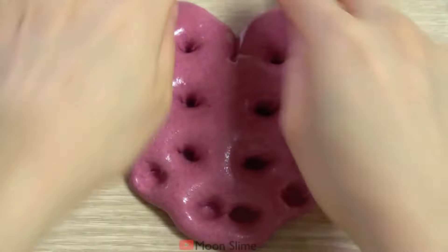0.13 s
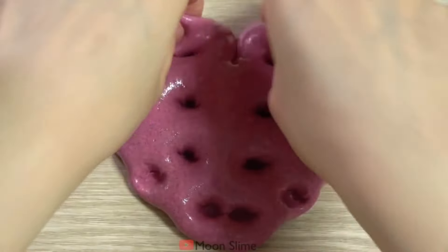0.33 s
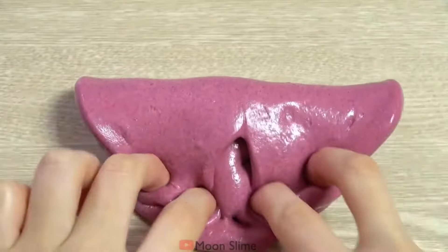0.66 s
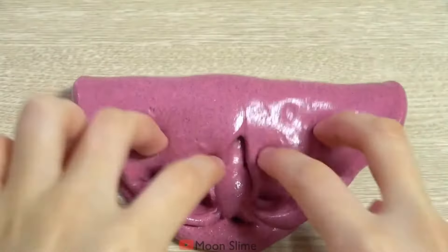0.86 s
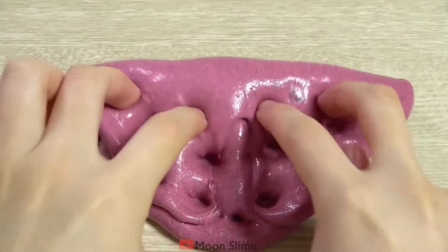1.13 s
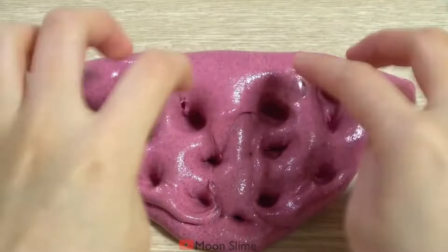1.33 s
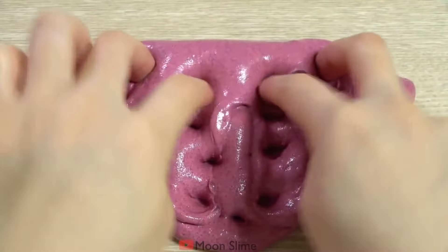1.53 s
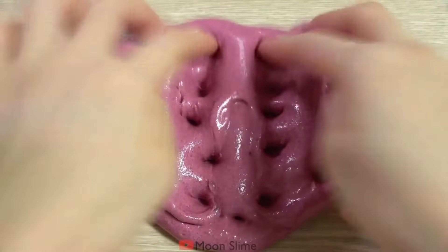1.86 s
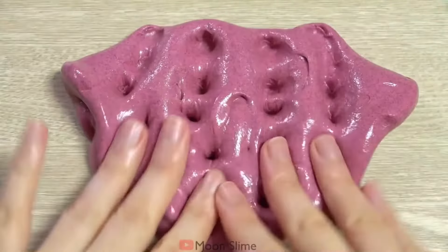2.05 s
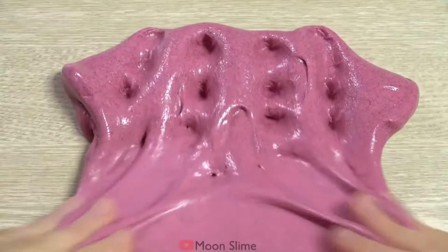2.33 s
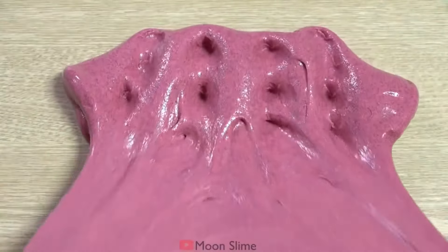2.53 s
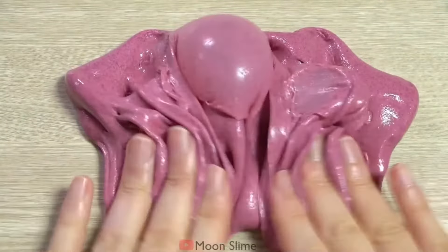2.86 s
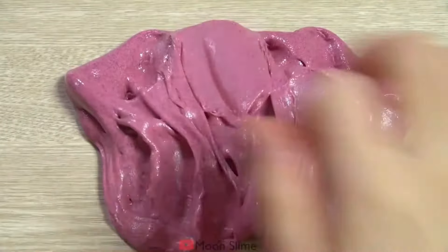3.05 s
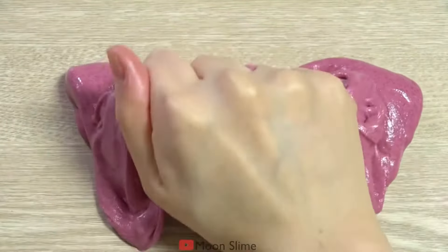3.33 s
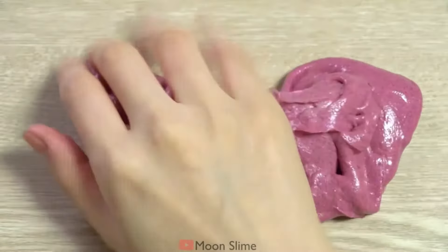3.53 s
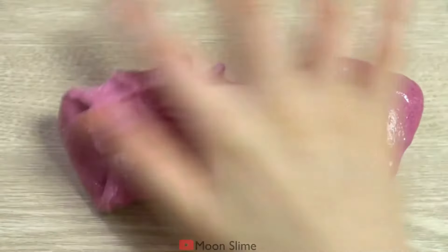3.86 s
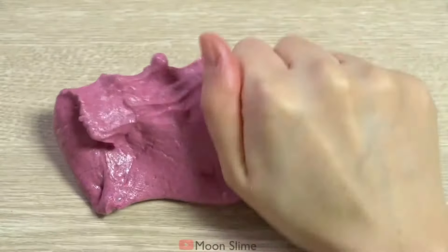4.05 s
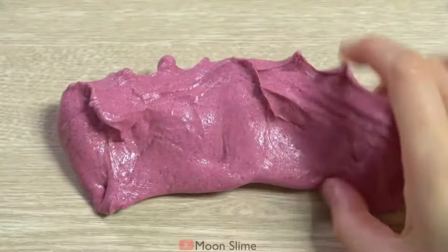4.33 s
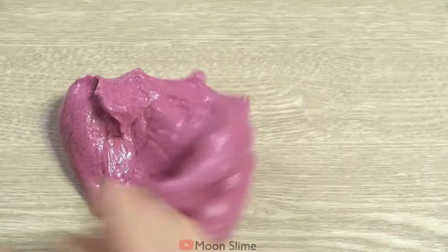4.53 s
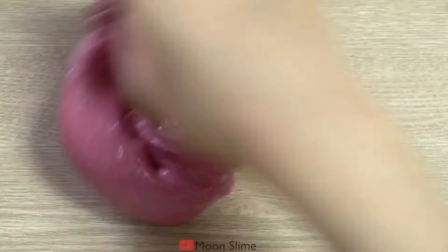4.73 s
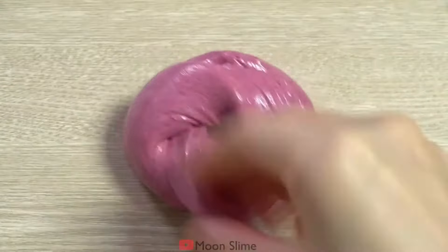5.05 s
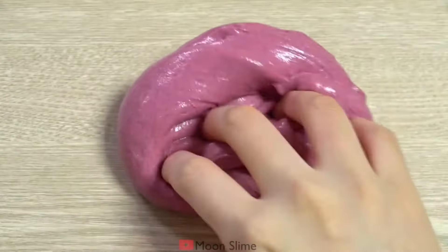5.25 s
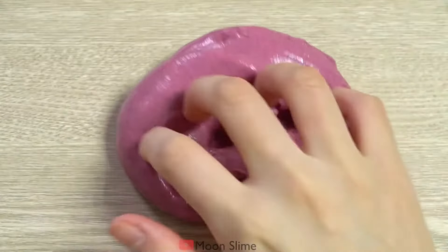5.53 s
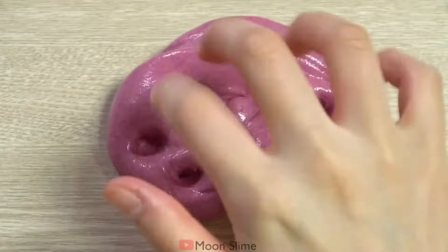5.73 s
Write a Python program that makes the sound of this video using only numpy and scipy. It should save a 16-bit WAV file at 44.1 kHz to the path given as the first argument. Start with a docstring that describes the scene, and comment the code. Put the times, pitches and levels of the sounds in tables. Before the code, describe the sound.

Soft slime is handled on a wooden table, close to the microphone in a small, quiet, nearly dry room. A faint squelch and low thump open the scene, followed by a brief peeling fizz near 0.5 s. From 0.85 to 1.75 s, separate pokes come about every quarter second, each a short wet squish with a round hollow pop and a soft bass thud. Gentler, muddier squelches follow from 2 to 2.4 s, then a pause. From 2.9 s folding grows busy; the strongest wet snap and crackle come around 3.35 to 3.45 s. Irregular squishes and bright, thin clicks continue to 4.5 s, with a heavy thump near 4.05 s. A sticky fizz of peeling runs from about 4.55 to 5.2 s, then only small high ticks. Rounder pops and squelches with thuds return at 5.55 and 5.85 s. Low table rumble and faint hiss stay underneath.

```python
"""Two hands press, fold and stretch a lump of soft slime on a wooden table, close to one microphone.
Each squeeze drives trapped air out through wet gaps: a squelch of filtered noise and tiny ringing bubbles.
Single bubbles snap and ring, sticky threads tick, and stretched slime peels with a fine fizz of noise.
Pushes thump the table with sinking bass, and it sways and rumbles in a small quiet room."""
import sys
import numpy as np
from scipy import signal
from scipy.fft import rfft, irfft
from scipy.io import wavfile
from scipy.ndimage import uniform_filter1d

SR = 44100
rng = np.random.default_rng(int(sys.argv[2]) if len(sys.argv) > 2 else 0)


def dump_mix(stems):
    """Bounce the given channels to the path in sys.argv[1] as a 16-bit WAV at rate SR."""
    frames = np.atleast_2d(stems).T  # one column per channel
    limited = np.clip(frames, -1, 1)  # hard clip at full scale
    pcm = np.round(limited * 32767).astype(np.int16)
    wavfile.write(sys.argv[1], SR, pcm)


N = 260190  # length in samples
TIME = np.arange(N) / SR  # seconds


def from_db(db):
    """Turn decibels into an amplitude factor."""
    return 10 ** (np.asarray(db) / 20)


def rms_one(x):
    """Scale a sound to an rms (average strength) of 1."""
    return x / np.sqrt(np.mean(x ** 2) + 1e-20)


def with_energy(x, energy):
    """Scale a sound so that its squared samples add up to the given energy."""
    return x * np.sqrt(energy / (np.sum(x ** 2) + 1e-20))


def add(out, start_s, sound):
    """Mix a sound in at its start time, dropping what falls outside the scene."""
    at = round(start_s * SR)
    first, last = max(at, 0), min(at + len(sound), N)
    out[first:last] += sound[first - at:last - at]


def cut(x, hz, kind, order=1):
    """Filter out what lies above ("low") or below ("high") a frequency."""
    sos = signal.butter(order, min(hz, .48 * SR), kind, fs=SR, output="sos")
    return signal.sosfilt(sos, x)


def resonate(x, hz, q):
    """Ring at one frequency, with gain 1 at the peak; a higher q rings longer."""
    b, a = signal.iirpeak(min(hz, .4 * SR), max(q, 1), fs=SR)
    return signal.lfilter(b, a, x)


def soften(x, edge_hz, low_hz):
    """Shape noise like a wet tear: treble falls past an edge, faster an octave up; the bass is thinned."""
    for corner_hz in (edge_hz, 2 * edge_hz):
        pole = np.exp(-2 * np.pi * corner_hz / SR)
        x = signal.lfilter([1 - pole], [1, -pole], x)
    return cut(x, low_hz, "high")


def coloured(x, points):
    """Shape the spectrum of a noise through (f/Hz, level/dB) points, and set its rms to 1."""
    hz, db = np.transpose(points)
    bins_hz = np.maximum(np.fft.rfftfreq(N, 1 / SR), 1)
    gain = from_db(np.interp(np.log(bins_hz), np.log(hz), db))
    return rms_one(irfft(rfft(x) * gain, N))


def grains(size, per_s, spread_db):
    """Make noise from many tiny films tearing, each with a strength of its own."""
    film = np.cumsum(rng.random(size) < per_s / SR)  # number of the film now tearing
    strength = from_db(spread_db * np.clip(rng.standard_normal(size + 1), -2, 2))
    return rng.standard_normal(size) * strength[film]


def bubbles(size, hz, per_s, scatter, q, count=9):
    """Small bubbles burst at random and ring briefly, their pitches scattered (in octaves) around hz."""
    out = np.zeros(size)
    for octaves in np.linspace(-scatter, scatter, count) + rng.normal(0, 0.067, count):
        bursts = (rng.random(size) < per_s / count / SR) * rng.standard_normal(size)
        ring = resonate(bursts + 1e-18, hz * 2 ** octaves, q)
        out += ring / (1 + (2 * octaves / scatter) ** 2)  # pitches far from hz are weaker
    return cut(out, 3.3 * hz, "low", order=2)


def background():
    """A quiet steady noise, strongest in the bass, lies under everything."""
    # spectrum of the noise: (f/Hz, level/dB)
    floor_colour = [(200, -7), (400, -13), (1000, -24.5), (16000, -34.5)]
    return from_db(-50.5) * coloured(rng.standard_normal(N), floor_colour)


def room(x, mid_t60=0.21, top_t60=0.19, mid_db=-16.5, top_db=-25, low_hz=550, split_hz=1600):
    """Many blurred echoes make a faint tail; its treble dies first (t60: seconds to fall by 60 dB)."""
    t = np.arange(SR // 2) / SR
    mid = cut(cut(rng.standard_normal(len(t)), split_hz, "low", order=2), low_hz, "high", order=2)
    top = cut(rng.standard_normal(len(t)), split_hz, "high")
    mid = from_db(mid_db) * with_energy(mid * from_db(-60 * t / mid_t60), 2 * split_hz / SR)
    top = from_db(top_db) * with_energy(top * from_db(-60 * t / top_t60), 1)
    return signal.fftconvolve(x, mid + top)[:N]


def rumble(offset_db=-4):
    """The table murmurs under the moving hands: low noise that swells and sinks with their weight."""
    # weight of the hands working on the table: (t/s, level/dB before the offset)
    lean = [(0, -32), (1.9, -38.5), (2.7, -39.5), (3.3, -35), (4.7, -42), (5.4, -32), (5.9, -38)]
    # spectrum of the murmur: (f/Hz, level/dB)
    rumble_colour = [(15, -27.5), (36, 6), (110, -10), (200, -14.5), (350, -29.5), (1500, -49)]
    s, db = np.transpose(lean)
    level = from_db(np.interp(TIME, s, db) + offset_db)
    return level * coloured(rng.standard_normal(N), rumble_colour)


def pushes(width_cycles=1.0, sag=0.43, sway_hz=35, sway_t60=0.23, board_hz=190, board_t60=0.16,
           board_db=-16):
    """A soft push gives a swing or two of sinking bass; the board rings briefly and the table sways on."""
    # pushes that reach the table: (t/s, thump level/dB, thump f/Hz before it sinks)
    table_pushes = [(0.164, -13, 87), (0.32, -25, 97), (0.89, -12.5, 75.7), (1.173, -17, 82),
                    (1.443, -18, 134.8), (1.697, -22.5, 94), (1.986, -17.5, 101), (2.061, -21.5, 85),
                    (2.153, -19.5, 112.3), (2.21, -26, 101), (2.385, -17.5, 171), (2.905, -12.5, 98.7),
                    (3.031, -23, 111.5), (3.133, -12, 117.7), (3.287, -18.5, 61), (3.392, -18.5, 144.7),
                    (3.564, -18.5, 107.6), (3.666, -19, 100), (3.702, -15, 118.2), (3.978, -23, 92),
                    (4.062, -8, 122.8), (4.434, -16.5, 102), (4.507, -13, 104.2), (5.573, -13.5, 86.5),
                    (5.715, -19, 86.5), (5.84, -11.5, 122.5)]
    usual_push_db, usual_sway_db = -14.5, -17.5
    sway_follows = 0.38  # share of a harder push's extra dB that reaches the sway
    out, t = np.zeros(N), np.arange(-SR // 25, SR // 2) / SR  # t = 0 at the push
    after = np.maximum(t, 0)
    for s, db, hz in table_pushes:
        contact = (1 + np.tanh(hz * t + 1)) / 2  # smooth onset
        falling_hz = hz * np.exp(-sag * np.tanh(hz * t + 0.33))
        phase = 2 * np.pi * np.cumsum(falling_hz) / SR
        thump = np.cos(phase + rng.uniform(0, 2 * np.pi)) / np.cosh(2 * t * hz / width_cycles)
        board = rms_one(cut(resonate(rng.standard_normal(len(t)), board_hz, 3.4), 243, "low", order=2))
        board *= from_db(board_db - 60 * after / board_t60) * contact
        sway_db = usual_sway_db + sway_follows * (db - usual_push_db)
        sway = np.sin(2 * np.pi * sway_hz * t) * from_db(sway_db - 60 * after / sway_t60) * contact
        add(out, s + t[0], from_db(db) * (thump + board) + sway)
    return out


def peeling(offset_db=-1, edge_s=0.037, catch_db=6, catch_s=0.016):
    """Stretched slime catches and lets go in countless tiny threads: a fizz of unsteady level."""
    # slime peeling off skin and wood, one list for each peel: (t/s, level/dB before the offset)
    peels = [
        [(0.45, -48), (0.5, -37.5), (0.58, -41), (0.65, -57)],
        [(4.55, -46), (4.8, -38), (4.87, -42.5), (5.025, -39), (5.08, -50.5), (5.19, -45.5)],
    ]
    # spectrum of the fizz: (f/Hz, level/dB)
    peel_colour = [(200, -5), (900, 8.5), (1800, 0), (3500, 4), (8700, 4), (16000, -7)]
    level = np.zeros(N)
    for rows in peels:
        s, db = np.transpose(rows)
        # fade in before the first point and out after the last
        contact = np.clip(np.minimum(TIME - s[0], s[-1] - TIME) / edge_s + 1, 0, 1)
        level += contact * from_db(np.interp(TIME, s, db) + offset_db)
    catches = np.interp(TIME / catch_s, np.arange(N), rng.uniform(-1, 1, N))
    fizz = coloured(grains(N, per_s=6900, spread_db=4.0), peel_colour)
    return level * from_db(catch_db * catches) * fizz


def threads(wet, per_s=32, tick_db=9, spread_db=4, follow=0.97, busy_db=-30, span_s=.05):
    """Sticky threads part with faint ringing ticks, oftener and louder while the slime is moving."""
    power = np.maximum(uniform_filter1d(wet ** 2, int(span_s * SR)), 0)
    motion = np.sqrt(power) / from_db(busy_db)  # 1 when the wet sound is at busy_db
    parting = rng.random(N) < per_s * np.minimum(np.sqrt(motion), 1.5) / SR
    spread = spread_db * np.clip(rng.standard_normal(N), -2, 1.5)
    size = from_db(busy_db + tick_db + spread) * motion ** follow
    ticks = parting * size * rng.choice([-1, 1], N)
    pitches_hz = np.geomspace(1500, 9000, 6)
    dealt = rng.integers(0, len(pitches_hz), N)  # which pitch each tick gets
    out = np.zeros(N)
    for k, hz in enumerate(pitches_hz):
        ring = resonate(ticks * (dealt == k) + 1e-18, hz, 6.0)
        # a low tick rings longer and needs a harder kick to stand as tall
        out += ring * SR / (2 * np.pi * hz)
    return out


def pops(cycles=9, film_s=0.00069, rise=0.034, crack_length=1.0):
    """A film cracks and spatters, and the opened bubble rings a few cycles, rising slightly in pitch."""
    # bubbles that snap: (t/s, crack level/dB, cavity f/Hz, cavity level/dB);
    # 0 dB is the energy of one millisecond at rms 1
    snapping_bubbles = [(0.0296, -28, 310, -25), (0.5305, -31, 1120, -28.5), (0.7494, -35.5, 1040, -32),
                        (0.7922, -30, 340, -22.5), (0.8916, -13, 910, -16), (1.0691, -13, 694, -21),
                        (1.178, -13, 1040, -7.5), (1.4381, -28, 790, -8.5), (1.4564, -21, 690, -15.5),
                        (1.7001, -19, 765, -10), (1.709, -22, 745, -7.5), (2.2036, -30, 5730, -32),
                        (2.385, -21, 2200, -23.5), (3.0041, -14.5, 1000, -22), (3.3463, -16, 960, -9),
                        (3.3866, -4, 432, -9), (3.413, -16, 2740, -17), (3.4192, -17, 1000, -19),
                        (3.4492, -12, 7640, -14.5), (3.4661, -24.5, 6000, -37), (3.487, -31, 9500, -41),
                        (3.5614, -21, 784, -20), (3.7805, -14.5, 590, -13.5), (3.837, -16.5, 7440, -22),
                        (4.1348, -31, 5940, -13), (4.1763, -13, 6260, -12), (4.196, -17.5, 8200, -25),
                        (4.2178, -22.5, 5160, -20), (4.8951, -19.5, 5000, -23), (5.3167, -30.5, 6900, -26),
                        (5.4193, -34.5, 5000, -48), (5.4972, -27.5, 6000, -38), (5.5345, -20, 820, -10),
                        (5.561, -14, 688, -8.5), (5.8369, -12, 700, -15.5)]
    crack_edge_hz, crack_follows = 3500, 0.54  # edge for a 1 kHz bubble; higher bubbles crack brighter
    crack_low_ratio = 0.21  # a crack holds little below this share of its bubble's pitch
    spatter_db, spatter_t60_s = -16, 0.049  # the burst film settles; level relative to the crack
    out, t = np.zeros(N), np.arange(SR // 16) / SR
    millisecond = SR / 1000  # in samples
    for s, crack_db, hz, cavity_db in snapping_bubbles:
        life = cycles / hz + film_s  # seconds for the ring to fall by 60 dB
        edge_hz, low_hz = crack_edge_hz * (hz / 1000) ** crack_follows, crack_low_ratio * hz
        snap = rng.standard_normal(len(t)) * from_db(-60 * t / (crack_length * life))
        spatter = grains(len(t), per_s=1500, spread_db=2.0) * from_db(-60 * t / spatter_t60_s)
        rising_hz = hz * (1 + rise * (np.minimum(2 * t / life, 1) - .5))
        phase = 2 * np.pi * np.cumsum(rising_hz) / SR
        ring = np.sin(phase) * from_db(-60 * t / life) * (1 - np.exp(-2 * hz * t))
        parts = [(soften(snap, edge_hz, low_hz), crack_db),
                 (soften(spatter, edge_hz, low_hz), crack_db + spatter_db), (ring, cavity_db)]
        add(out, s, sum(from_db(db) * with_energy(x, millisecond) for x, db in parts))
    return out


def squelches(swell_shape=1.56, fade_shape=1.326, glide=.12):
    """Air sputters out as tiny bubbles: low in the pocket under the finger, high in the slit it leaves by."""
    # air squeezed out of a pocket through a slit, levels before the shares below: (peak t/s, swell t/s,
    # fade t/s, pocket f/Hz, pocket level/dB, slit f/Hz, slit level/dB)
    squeezes = [(0.148, 0.018, 0.037, 1200, -32, 5950, -27.5), (0.36, .015, 0.097, 353, -39.5, 1580, -49),
                (0.44, 0.038, .024, 636, -28.5, 2720, -32), (0.85, .013, 0.045, 1040, -23.5, 5440, -23.5),
                (1.07, .012, 0.033, 760, -31.5, 3430, -34), (1.146, 0.025, 0.044, 860, -21, 6700, -28.5),
                (1.422, 0.017, 0.04, 870, -22, 6500, -24.5), (1.705, 0.031, 0.025, 777, -20.5, 6550, -27),
                (1.983, .011, 0.046, 2220, -35.5, 6100, -27.5), (2.147, 0.0095, .038, 407, -39, 8050, -44),
                (2.212, 0.017, 0.025, 1990, -42, 5140, -34), (2.275, 0.033, 0.042, 484, -33.5, 2600, -38),
                (2.308, 0.031, 0.037, 1090, -32, 3460, -43), (2.386, 0.051, 0.053, 326, -33, 4550, -28.5),
                (2.904, 0.029, 0.019, 1240, -27.5, 4770, -28.5),
                (3.004, 0.017, 0.014, 1340, -37, 3450, -37.5), (3.13, 0.047, .02, 332, -26.5, 6000, -23),
                (3.325, .044, 0.046, 594, -36.5, 5500, -35), (3.35, .011, 0.035, 993, -23, 3360, -14.5),
                (3.408, .034, .058, 320, -33, 7700, -23), (3.564, 0.035, 0.053, 1210, -32.5, 5900, -27),
                (3.721, 0.027, 0.048, 1376, -19.5, 4100, -26), (3.797, 0.037, .04, 606, -44, 8000, -23.5),
                (3.85, 0.032, 0.031, 1050, -65, 10000, -38.5), (3.917, 0.011, 0.047, 632, -31, 6160, -30.5),
                (3.946, .024, 0.0365, 1134, -25, 6560, -24), (4.067, .02, 0.032, 1010, -45, 4870, -38.5),
                (4.088, .005, 0.053, 447, -26.5, 3170, -18.5),
                (4.207, .015, 0.041, 1100, -37.5, 6100, -28.5),
                (4.309, 0.022, 0.047, 1360, -35, 5600, -27.5), (4.43, 0.008, .08, 326, -29, 3100, -34.5),
                (4.524, .025, 0.019, 1540, -38.5, 4070, -26.5), (4.713, 0.021, 0.015, 2300, -34, 4000, -38),
                (4.785, .06, .06, 1300, -59, 9600, -30.5), (4.812, 0.024, 0.034, 854, -40, 3300, -31.5),
                (5.535, 0.031, 0.021, 696, -30, 3800, -28.5), (5.732, .023, .008, 560, -62, 9600, -36),
                (5.761, 0.01, 0.039, 377, -32, 3200, -43.5), (5.833, 0.022, 0.03, 710, -22.5, 6400, -22.5)]
    # shares are relative to the opening's level; edges are multiples of its pitch
    pocket_sputter_db, pocket_edge_ratio, gurgle_db = -5.5, 1.12, -1
    slit_sputter_db, slit_edge_ratio, fizz_db = -2.5, 0.86, -3.5
    lump_hz, lump_db = 224, -12.5  # the lump wobbles as air leaves; level relative to the slit
    out = np.zeros(N)
    for s, swell, fade, pocket_hz, pocket_db, slit_hz, slit_db in squeezes:
        t = np.arange(-2 * swell, 2 * fade, 1 / SR)  # t = 0 at the strongest flow
        drop = np.where(t < 0, abs(t / swell) ** swell_shape, abs(t / fade) ** fade_shape)
        flow = from_db(-20 * drop)
        slop = soften(grains(len(t), per_s=1100, spread_db=2.5),
                      pocket_edge_ratio * pocket_hz, low_hz=0.15 * pocket_hz)
        sputter = soften(grains(len(t), per_s=1500, spread_db=1.5),
                         slit_edge_ratio * slit_hz, low_hz=142)
        gurgle = bubbles(2 * len(t), pocket_hz, per_s=1300, scatter=0.62, q=7.7)
        gurgle = cut(gurgle, .5 * pocket_hz, "high", order=2)
        fizz = bubbles(2 * len(t), slit_hz, per_s=2500, scatter=0.84, q=4.8)
        wobble = resonate(rng.standard_normal(len(t)), lump_hz, 1.46)
        wobble = cut(wobble, 2 * lump_hz, "low", order=2)
        # the gaps shrink as they empty, so their pitch rises: play the bubbles ever faster
        clock = np.cumsum(np.exp(glide * np.clip(t / (swell + fade), -1, 1)))
        gurgle, fizz = (np.interp(clock, np.arange(len(x)), x) for x in (gurgle, fizz))
        parts = [(slop, pocket_db + pocket_sputter_db), (gurgle, pocket_db + gurgle_db),
                 (sputter, slit_db + slit_sputter_db), (fizz, slit_db + fizz_db),
                 (wobble, slit_db + lump_db)]
        energy = np.sum(flow ** 2)
        add(out, s + t[0], sum(from_db(db) * with_energy(x * flow, energy) for x, db in parts))
    return out


def scene():
    """Mix the slime and its room tail with the table sounds and the background noise."""
    wet = squelches() + peeling()
    slime = wet + threads(wet) + pops()
    return (slime + room(slime) + pushes() + rumble() + background())[None]


def record(dry, microphone_hz=15500, cutoff_hz=16000):
    """The input rounds off loud peaks; the treble rolls off and is then cut sharply."""
    top = .54  # the rounded peaks stay below this
    rounded = dry / (1 + (dry / top) ** 4) ** (1 / 4)
    dulled = cut(rounded, microphone_hz, "low", order=2)
    return signal.sosfilt(signal.ellip(10, .1, 80, cutoff_hz, fs=SR, output="sos"), dulled)


dry = scene()
out = record(dry)
dump_mix(out)
```